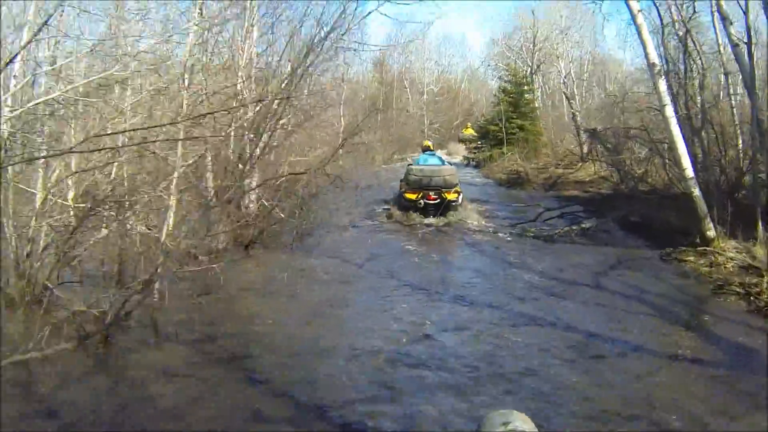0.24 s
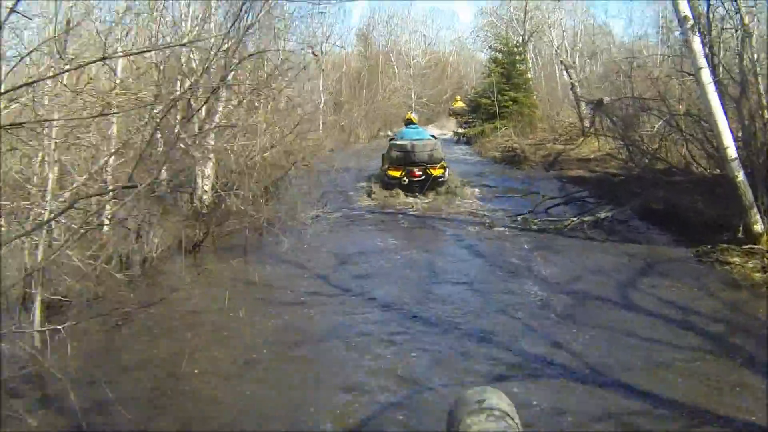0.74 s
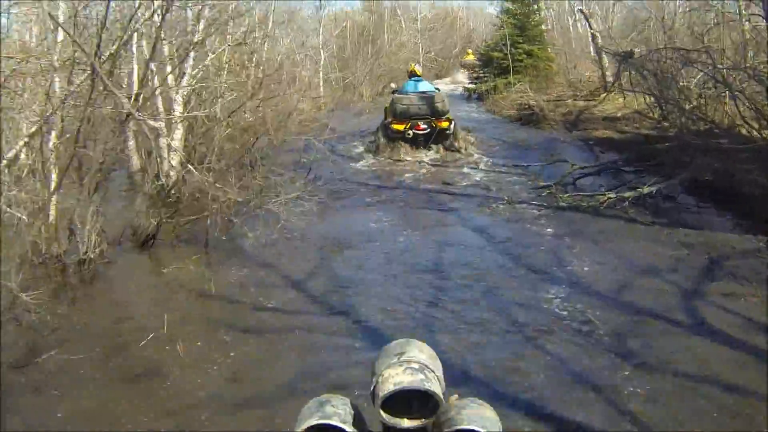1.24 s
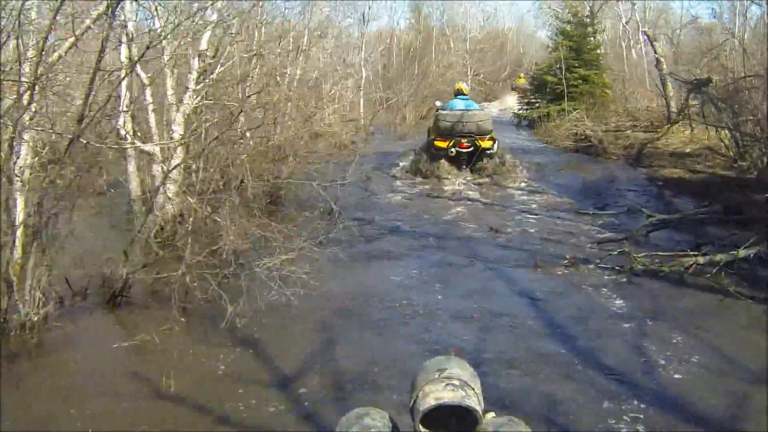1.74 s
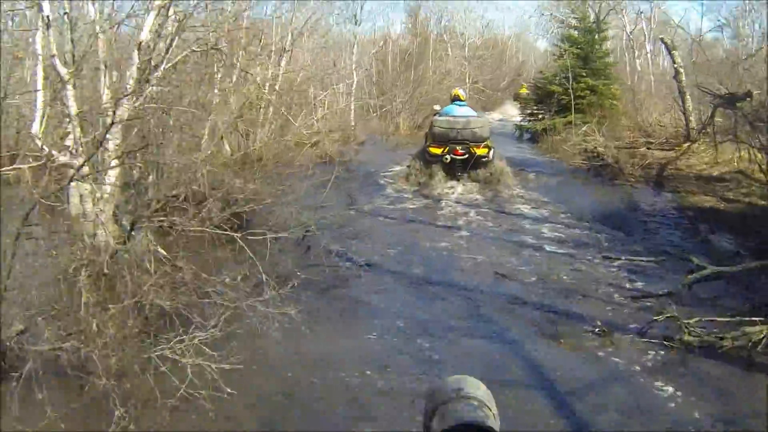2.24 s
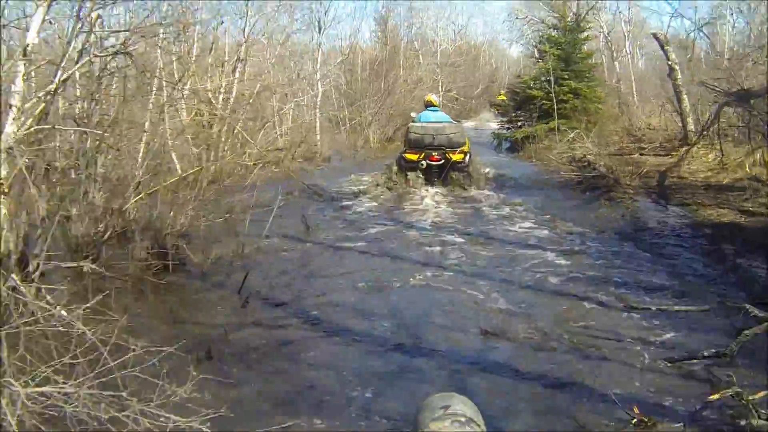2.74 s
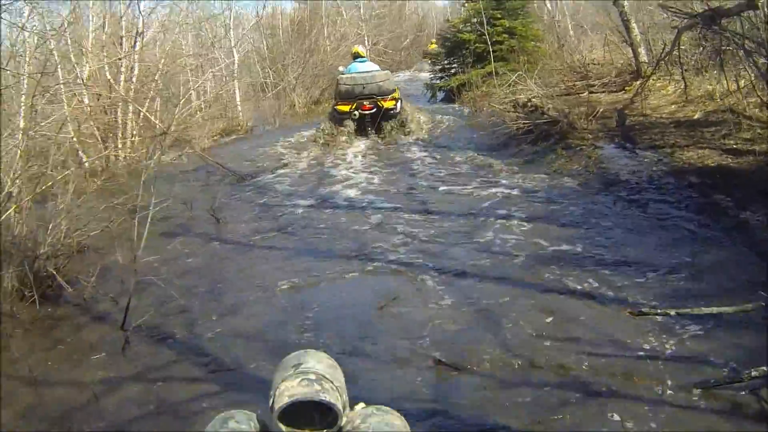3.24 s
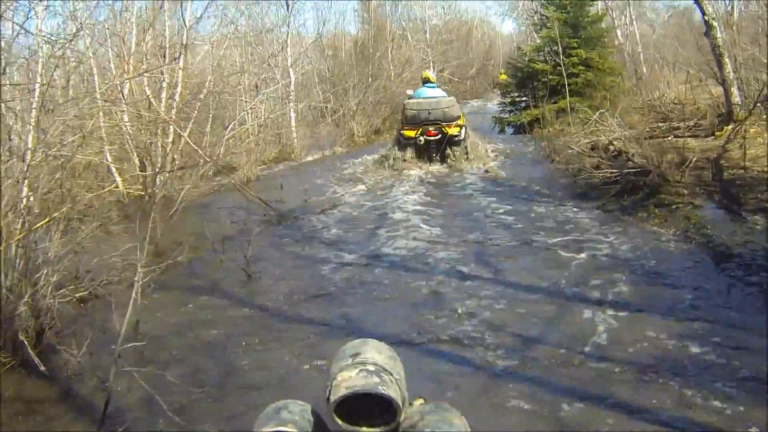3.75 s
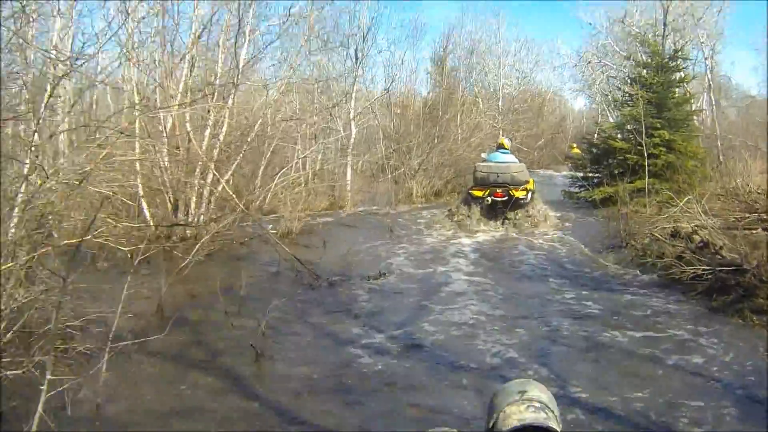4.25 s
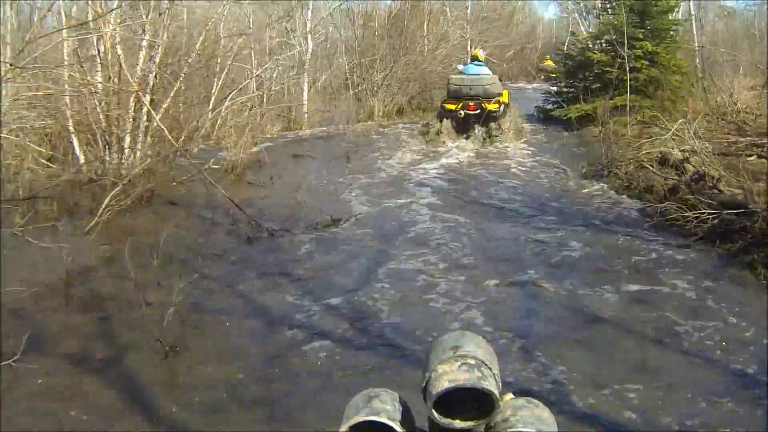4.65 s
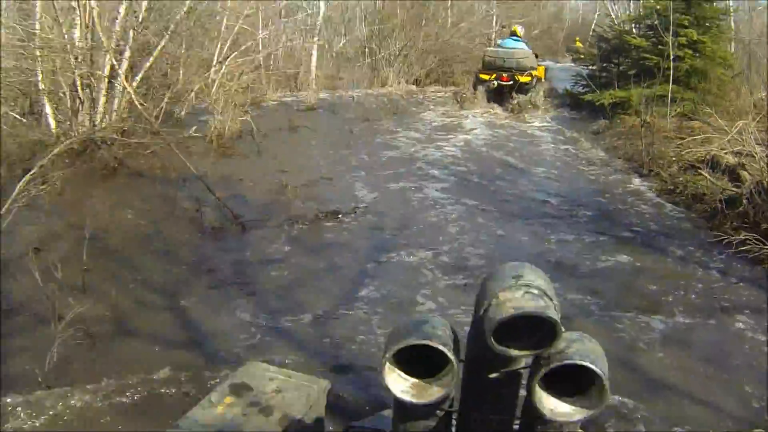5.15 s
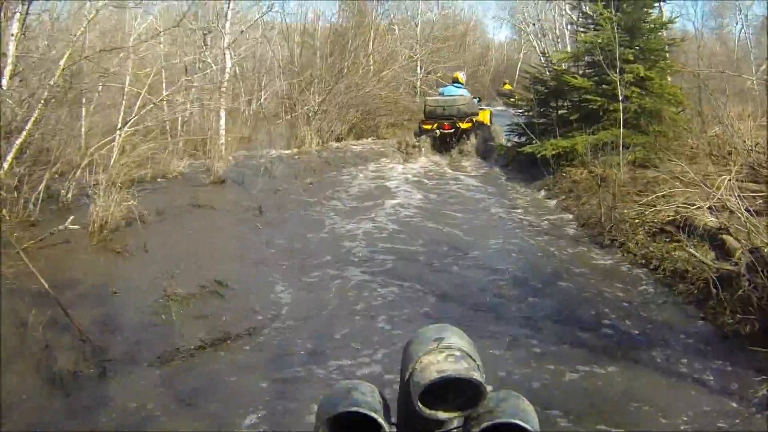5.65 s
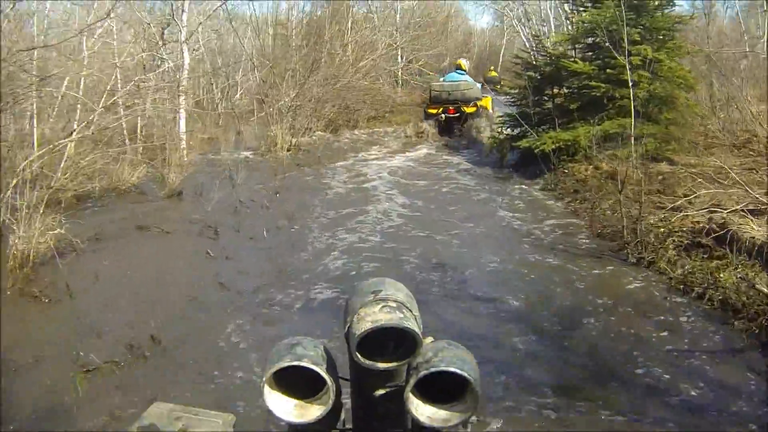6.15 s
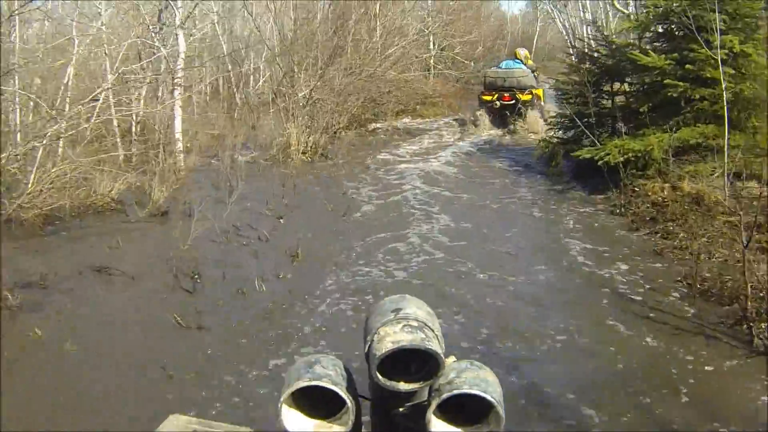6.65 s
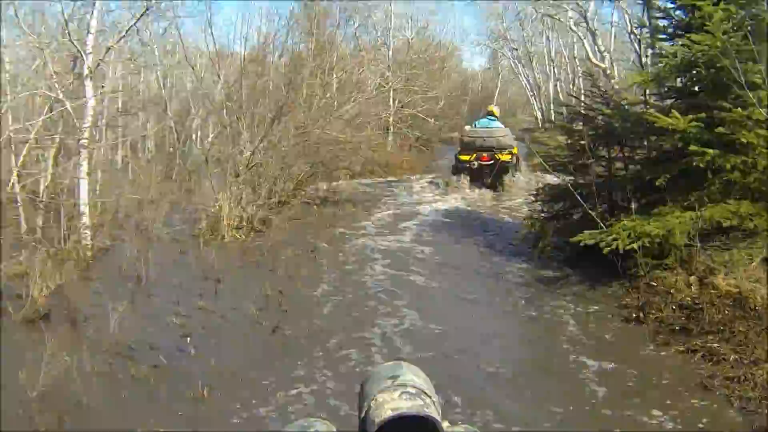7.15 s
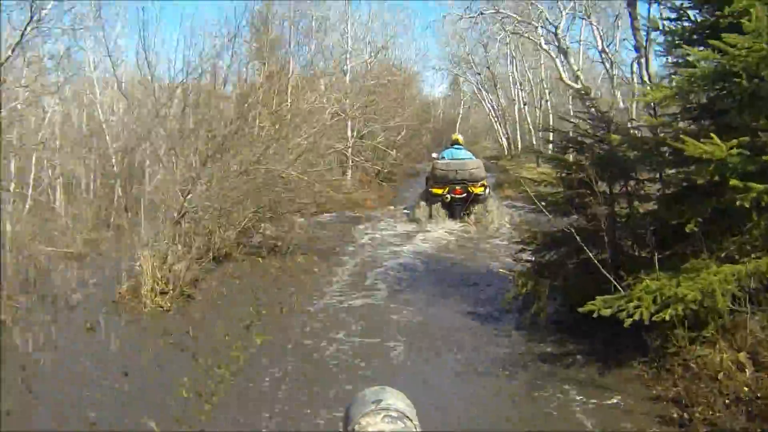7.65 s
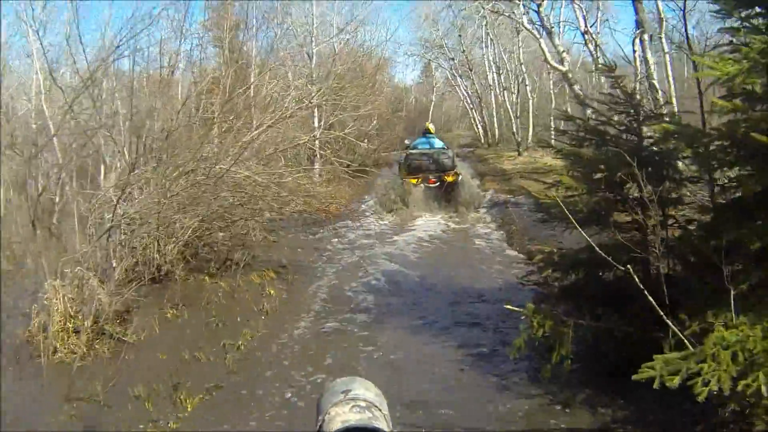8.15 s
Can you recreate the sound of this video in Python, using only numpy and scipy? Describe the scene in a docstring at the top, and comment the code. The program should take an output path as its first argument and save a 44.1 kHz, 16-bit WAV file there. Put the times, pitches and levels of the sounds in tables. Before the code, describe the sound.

A twin-cylinder all-terrain vehicle is already droning at the start, heard close from its seat in open flooded woodland. Revs dip slightly until about 0.6 seconds, the sound low and subdued, then climb with growing overtones and metallic clatter by 1.5 to 2. A tiny thumping stumble passes at 2.3. It pulls steadily through 3 and 4, pressing harder near 4.7 and 5.3, with faint gear whine. At 5.5 the throttle shuts and pitch drops; around 5.8 it leaps into a loud, rasping, clattering full-throttle roar lasting to 6.8. Revs sag until 7.4, then rise again to the end at 8.4. Snorkel rasp and thin intake hiss follow the engine. Muddy water washes and splashes quietly beneath throughout, with tiny plips. Deep wind buffets the microphone, gusting most around 4.7 and 5.3, again after 6.

```python
"""An engine drones from the start: a V-twin all-terrain vehicle wades along a flooded forest trail.
Heard from the seat, its exhaust sums tones locked to the crank; knocks and noise make clatter, rasp and hiss.
The throttle shuts briefly, opens wide, then eases.
Water, made of shaped noise and short plips, washes and splashes round the wheels.
Moving air, made of very low noise, buffets the microphone in gusts."""
import sys
import numpy as np
from scipy import signal
from scipy.fft import rfft, irfft, next_fast_len
from scipy.io import wavfile
from scipy.ndimage import uniform_filter1d

SR = 44100
rng = np.random.default_rng(int(sys.argv[2]) if len(sys.argv) > 2 else 0)


def output_pcm(signal):
    """Save a mono or channel-first signal as 16-bit PCM at the path in sys.argv[1].

    Samples are clipped to [-1, 1] before scaling.
    """
    pcm = np.clip(np.atleast_2d(signal).T, -1, 1) * 32767
    wavfile.write(sys.argv[1], SR, np.round(pcm).astype(np.int16))


N = 370881
TIME = np.arange(N) / SR

# engine speed; one cycle is two turns of a four-stroke crank: (time [s], speed [cycles/s])
ENGINE_SPEED = [(0, 35), (0.09, 32.29), (0.62, 30.51), (1.45, 33.05), (1.8, 35.79), (2.2, 37.49),
                (2.47, 37.57), (2.56, 37.32), (2.94, 37.75), (3.32, 39.25), (4.24, 39.14), (4.66, 40.49),
                (4.75, 42.52), (5.02, 40.22), (5.26, 41.61), (5.44, 41.38), (5.62, 32.99), (5.7, 33.32),
                (5.77, 36.11), (5.88, 44.41), (6.0, 48.39), (6.24, 48.13), (6.31, 49.48), (6.69, 49.84),
                (6.84, 47.8), (6.95, 43.53), (7.2, 39.84), (7.38, 38.96), (7.58, 41.06), (8.38, 44.16)]
# how far the throttle is open: (time [s], opening [0 shut - 1 wide open])
THROTTLE_OPENING = [(0, 0.23), (1.2, .25), (2, 0.41), (3, 0.46), (3.3, 0.48), (4.5, 0.52), (4.75, 0.8),
                    (5, 0.61), (5.25, 0.76), (5.45, 0.79), (5.5, .01), (5.66, 0.035), (5.8, 0.81),
                    (5.95, 0.99), (6.75, 0.95), (6.97, 0.85), (7.17, 0.65), (7.45, 0.7), (7.7, .78),
                    (8.41, 0.88)]
# strength of each exhaust tone: (multiple of cycle rate [-], shut [dB], half open [dB], wide open [dB])
FIRING_TONES = [(1.0, -11, -1, 12.5), (2.0, 7.5, 4, 9.5), (3.0, 4, -11, 7), (4.0, -7.5, 0.5, 4),
                (5.0, -21, 7, 3), (6.0, -2, 0.0, 2.5), (7.0, -16.5, -7.5, -6.5), (8.0, -3.5, -1.5, 9.5),
                (9.0, -0.5, -6, 8.5), (10.0, -19, 9, 5), (11.0, 0, 4.5, 3.0), (12.0, -2, -4.5, 5)]
# notes at which the exhaust pipe rings: (frequency [Hz], width [Hz], level [dB])
PIPE_RESONANCES = [(73.5, 12.7, -26.5), (109.7, 12.7, -21.5), (197.4, 14.8, -22.5), (255.9, 32.7, -29),
                   (346.8, 11.8, -32), (414, 45, -41.0), (555.5, 27, -39)]
# relative level of the exhaust's low thump: (time [s], level [dB])
THUMP_LEVEL = [(0, 0), (2.2, -1.5), (2.9, 1), (3.3, -3.5), (4.15, 4.5), (4.95, -3), (5.42, -1.5),
               (5.52, 2.5), (6.75, -2.5), (7.05, -5), (7.4, -1.5), (7.7, -2), (8.41, -0.5)]
# relative level of the exhaust's overtones: (time [s], level [dB])
OVERTONE_LEVEL = [(0, -7.5), (.25, -10.5), (.6, -5.5), (1.55, 2.5), (2, 1), (3.2, -2.5), (4.15, -0.7),
                  (5.05, 0.9), (5.38, -1), (5.48, -5), (5.66, 1), (5.83, 3.5), (6.05, -1.5), (6.82, .5),
                  (7.02, -3.5), (7.25, 0), (7.55, 0.5), (8.4, 1)]
# knocks within one cycle: (place [0-1 of a cycle], strength shut [-], strength wide open [-])
KNOCK_PLACES = [(.13, 0.91, 1), (.38, 0.76, 0.77), (0.591, 0.54, 0.84), (.81, 0.54, 0.52)]
# tone colour of the casing's clatter: (frequency [Hz], relative level [dB per Hz])
CLATTER_COLOUR = [(380, -19), (640, -35), (705, -20.5), (818, -7), (937, -8.5), (1020, -1), (1120, 3),
                  (1280, 0.5), (1450, -13.5), (1500, -7), (1950, -48), (3300, -120)]
# casing tones that the knocks favour: (multiple of cycle rate [-], shut [dB], wide open [dB])
FAVOURED_TONES = [(22, -5.5, 8), (23, 0.5, 0), (24, 2.5, 10), (25, -8.5, 1.5), (27, 6, 4.5), (28, 6.5, 6.5),
                  (31, 5.5, -3), (32, 5, -1)]
# relative level of the casing's clatter: (time [s], level [dB])
CLATTER_LEVEL = [(0, -28), (.6, -30), (1.3, -24.5), (1.6, -20), (1.9, -21.5), (3.05, -22.5), (3.2, -26.5),
                 (4.5, -23), (4.65, -22.5), (5, -23), (5.25, -23), (5.46, -24), (5.56, -31.5), (5.65, -31),
                 (5.72, -22), (5.9, -17.5), (6.15, -19.5), (6.55, -15), (7.05, -23.5), (7.3, -25),
                 (7.6, -22.5), (8, -24), (8.12, -19.5), (8.41, -21)]
# relative level of a gear's whine: (time [s], level [dB])
GEAR_LEVEL = [(0, -50), (3.3, -46), (4.55, -32), (4.85, -33.5), (5.2, -25), (5.55, -41), (7.4, -50),
              (7.8, -33.5), (8.41, -40)]
# tone colour of the snorkels' rasp: (frequency [Hz], relative level [dB per Hz])
RASP_COLOUR = [(820, -32), (1400, -9), (1470, -4.5), (1590, -1.5), (1770, -3), (1850, -0.5), (1920, 4.5),
               (2040, -5.5), (2220, -1.5), (2400, -13), (2610, -8.5), (2770, -11), (3190, -12.5),
               (3500, -16.5), (4550, -35.5), (7700, -120)]
# snorkel rasp at even throttle steps, shut to wide open: (level [dB])
RASP_BY_THROTTLE = [-29, -32, -30.5, -30, -27, -25.5]
# tone colour of the drawn air: (frequency [Hz], relative level [dB per Hz])
HISS_COLOUR = [(3000, -12), (3900, -4), (4500, -7), (4690, 1.5), (4900, -1.5), (5650, -8), (6100, -5.5),
               (7600, -13.5), (8150, -7.5), (10500, -18), (11500, -13), (13500, -22), (15000, -32)]
# hiss of drawn air at even throttle steps, shut to wide open: (level [dB])
HISS_BY_THROTTLE = [-56, -52.7, -54.5, -52.5, -51, -46.5]
# tone colour of the churned water: (frequency [Hz], relative level [dB per Hz])
WATER_COLOUR = [(40, -5), (130, -16), (300, -4.5), (450, -12.5), (570, -4), (690, -18), (1000, -17),
                (2000, -27), (4000, -30), (8000, -50.5), (15000, -65)]
# tone colour of the air at the microphone: (frequency [Hz], relative level [dB per Hz])
WIND_COLOUR = [(3, 4), (10, 3.5), (22, 2), (36, -10), (60, -14.5), (140, -18), (400, -57)]
# gusts at the microphone: (time [s], rise above the breeze [dB])
GUST_TIMES = [(0.02, 7.5), (1.43, 4.5), (3.7, 4), (4.1, 5.5), (4.68, 9.5), (5.28, 12), (6.19, 7), (6.62, 7)]

# unevenness of the firings (0-1): always, extra with the throttle shut,
# and extra per cycle/s gained or lost each second
UNEVEN, UNEVEN_SHUT, UNEVEN_PER_SLEW = 0.06, 0.13, 0.0028
# the engine stumbles once: extra unevenness (0-1), extra thump (dB)
STUMBLE_S, STUMBLE_LENGTH_S, STUMBLE_UNEVEN, STUMBLE_DB = 2.3, 0.035, 0.38, 6.5
HOP = 32  # samples between slow control values


def amp(db):
    """Turns decibels into gain."""
    return 10 ** (np.asarray(db) / 20)


def evened(x):
    """Scales a sound to an rms (average strength) of 1."""
    return x / np.sqrt(np.mean(x ** 2) + 1e-20)


def curves(rows):
    """Draws straight lines between a timed table's rows, one curve per column."""
    s, *columns = np.transpose(rows)
    return [np.interp(TIME, s, c) for c in columns]


def by_throttle(steps, throttle):
    """Reads values given at even throttle steps."""
    return np.interp(throttle, np.linspace(0, 1, len(steps)), steps)


def bump(at_s, length_s):
    """A smooth swell of height 1."""
    return np.exp(-((TIME - at_s) / length_s) ** 2)


def steadied(x, size=5000):
    """Evens out slow loudness changes, holding the short-time rms near 1."""
    power = uniform_filter1d(uniform_filter1d(x ** 2, size), size)
    return x / np.sqrt(abs(power) + 1e-12)


def wander(rate_hz):
    """Smooth random drift of rms 1."""
    knots = rng.standard_normal(8000)
    drift = np.interp(TIME * rate_hz, np.arange(len(knots)), knots)
    return evened(uniform_filter1d(drift, size=120))


def coloured(x, points, size=4096):
    """Gives a sound the listed colour; the filter only looks back, so peaks ring after a knock."""
    f, db = np.transpose(points)
    log_hz = np.log(np.abs(np.fft.fftfreq(size, 1 / SR)) + 1)
    # the level falls steeply outside the listed range
    skirts = np.maximum(np.log(f[0]) - log_hz, 0) + np.maximum(log_hz - np.log(f[-1]), 0)
    level_db = np.interp(log_hz, np.log(f), db) - 150 * skirts
    log_gain = np.log(amp(np.maximum(level_db, -100)))
    taps = np.fft.ifft(np.exp(np.conj(signal.hilbert(log_gain)))).real
    return signal.oaconvolve(np.r_[x[-size:], x], taps)[size:size + N]


def harmonics(turns, orders, sizes, shifts, waver):
    """Sums multiples of the crank cycle; each wavers a little in strength and phase."""
    out, slow = np.zeros(N), TIME[::HOP]
    for k, size, shift in zip(orders, sizes, shifts):
        drift = rng.standard_normal((2, len(slow)))
        a, b = uniform_filter1d(uniform_filter1d(drift, size=70), size=70)
        strength = size * np.exp(1j * shift) * (1 + waver * evened(a + 1j * b))
        tone = np.interp(TIME, slow, strength)
        out += (tone * np.exp(2j * np.pi * k * turns)).real
    return out


def unevenness(revs, throttle):
    """Firings are least regular off the throttle, while the speed changes, and in the stumble."""
    slew = uniform_filter1d(abs(np.gradient(revs)) * SR, size=4000)
    stumble = STUMBLE_UNEVEN * bump(STUMBLE_S, STUMBLE_LENGTH_S)
    uneven = UNEVEN + UNEVEN_SHUT * (1 - throttle) ** 2 + UNEVEN_PER_SLEW * slew + stumble
    return np.clip(uneven, 0, 1)


def exhaust(turns, throttle, uneven, second_firing=.39, thump_db=0.7, overtone_db=0.75):
    """Two unevenly spaced firings make tones that sing out as they cross the pipe's resonances."""
    order = np.arange(1, 18)[:, None]
    hz = order * curves(ENGINE_SPEED)[0][::HOP]
    # the charge in the cylinders follows the throttle smoothly
    charge = uniform_filter1d(throttle, size=3000)[::HOP]
    # the highest multiples share the last row
    rows = [FIRING_TONES[min(k, len(FIRING_TONES)) - 1] for k in order[:, 0]]
    firing_db = np.array([by_throttle(row[1:], charge) for row in rows])
    modes = np.array([amp(level) / (1 + 2j * (hz - f) / width) for f, width, level in PIPE_RESONANCES])
    firings = 1 + 0.85 * np.exp(-2j * np.pi * order * second_firing)
    lag = np.angle(modes.sum(0) * firings)
    thump = thump_db + curves(THUMP_LEVEL)[0] + STUMBLE_DB * bump(STUMBLE_S, STUMBLE_LENGTH_S)
    overtones = overtone_db + curves(OVERTONE_LEVEL)[0]
    level_db = np.where(order <= 4, thump[::HOP], overtones[::HOP])
    sizes = np.linalg.norm(modes, axis=0) * amp(firing_db + level_db)
    out = harmonics(turns, order[:, 0], sizes, lag, waver=.07)
    flutter = .6 * uneven
    return out * (1 + flutter * wander(110)) / np.sqrt(1 + flutter ** 2)


def knocks(turns, throttle, uneven, scatter_db=1.4, slip_s=.0003):
    """Firings and valve strokes: sharp pulses near fixed crank angles, never quite alike."""
    out, cycle = np.zeros(N), np.arange(int(turns[-1]))
    for place, shut, wide in KNOCK_PLACES:
        size, slip = rng.standard_normal((400, 2))[:len(cycle)].T
        s = np.interp(cycle + place, turns, TIME)
        # uneven running shifts each knock in time
        s = s + slip * slip_s * np.interp(s, TIME, uneven)
        at = np.clip(np.round(s * SR).astype(int), 0, N - 1)
        out[at] += (shut + (wide - shut) * throttle[at]) * amp(scatter_db * size)
    return out


def smeared(x, spread_s, ripple_hz):
    """Paths through the frame delay each pitch differently and blur a knock without colouring it."""
    hz = np.fft.rfftfreq(next_fast_len(N + 2000), 1 / SR)
    delay = spread_s * (1 + np.sin(2 * np.pi * hz / ripple_hz)) / 2
    turn = np.exp(-2j * np.pi * np.cumsum(delay) * hz[1])
    return irfft(rfft(x, 2 * len(hz) - 2) * turn)[:N]


def engine_part(pulses, colour, ring, steady, puff_s):
    """Each knock rings the part (ring: share of power) and lets out a puff of noise over a steady rush."""
    fade = np.exp(-1 / (puff_s * SR))
    puffs = steadied(signal.lfilter([1], [1, -fade], pulses))
    rush = coloured((steady + puffs) * rng.standard_normal(N), colour)
    rung = coloured(smeared(pulses, spread_s=0.004955, ripple_hz=408.3), colour)
    ring = np.clip(ring, 0, 1)
    return steadied(np.sqrt(ring) * steadied(rung) + np.sqrt(1 - ring) * steadied(rush))


def casing(turns, throttle, uneven, other_db=1.0):
    """Knocking that repeats every cycle makes a stack of tones, shaped by the casing's resonances."""
    blur, flutter = .4, .12  # random phase [rad], loudness flutter [share]
    order = np.arange(15, 47)[:, None]
    opening, hz = throttle[::HOP], order * curves(ENGINE_SPEED)[0][::HOP]
    favoured = {round(k): steps for k, *steps in FAVOURED_TONES}
    favour_db = np.array([by_throttle(favoured.get(k, [other_db]), opening ** 2) for k in order[:, 0]])
    db = favour_db + np.interp(hz, *np.transpose(CLATTER_COLOUR))
    # the tones add up roughly in step at each knock
    strokes = sum((shut + (wide - shut) * opening) * np.exp(-2j * np.pi * order * place)
                  for place, shut, wide in KNOCK_PLACES)
    lag = np.angle(strokes) + blur * rng.standard_normal(order.shape)
    out = harmonics(turns, order[:, 0], amp(db), lag, waver=.2)
    return steadied(out * (1 + (flutter + uneven / 2) * wander(90)))


def gear(turns, level_db=-1):
    """A gear locked to the crank whines at its tooth rate, 32 teeth a cycle."""
    whine = np.cos(2 * np.pi * 32 * turns + .4 * wander(30)) * (1 + .3 * wander(40))
    return amp(curves(GEAR_LEVEL)[0] + level_db) * evened(whine)


def whistle(hz=4690, width_hz=40):
    """Drawn air whistles thinly: slow random drift carried on a high tone."""
    r = np.exp(-np.pi * width_hz / SR)
    band = rng.standard_normal((2, N))
    for _ in range(2):
        band = signal.lfilter([1 - r], [1, -r], band)
    return evened(band[0] * np.cos(2 * np.pi * hz * TIME) + band[1] * np.sin(2 * np.pi * hz * TIME))


def engine(turns, throttle, uneven, clatter_db=-0.47, whistle_db=-12, throb_place=0.87, throb=0.53, shake=0.25):
    """The casing clatters, a gear whines, the snorkels rasp and drawn air hisses, led by the crank."""
    clatter = curves(CLATTER_LEVEL)[0]
    pulses = knocks(turns, throttle, uneven)
    # even running repeats cleanly; uneven running turns to loose noise
    clean = np.clip(.92 - uneven, 0, 1)
    loose = engine_part(pulses, CLATTER_COLOUR, ring=0, steady=0.38, puff_s=0.0022)
    rattle = np.sqrt(clean) * casing(turns, throttle, uneven) + np.sqrt(1 - clean) * loose
    # one cylinder knocks harder, so the rattle throbs once a cycle, most at light throttle
    beat = np.cos(2 * np.pi * (turns - throb_place))
    surge = steadied(1 + min(throb, 1) * (1 - throttle / 2) * beat)
    rasp = np.sqrt(surge) * engine_part(pulses, RASP_COLOUR, ring=.5, steady=2.3, puff_s=0.0092)
    # louder clatter also shakes the snorkels (shake: dB of rasp per dB of clatter)
    rasp_db = by_throttle(RASP_BY_THROTTLE, throttle) + shake * (clatter - clatter.mean())
    hiss = engine_part(pulses, HISS_COLOUR, ring=.02, steady=3.2, puff_s=.005)
    hiss = hiss + amp(whistle_db) * whistle()
    hiss_db = by_throttle(HISS_BY_THROTTLE, throttle)
    return (amp(clatter + clatter_db) * steadied(rattle * surge) + gear(turns)
            + amp(rasp_db) * rasp + amp(hiss_db) * hiss)


def water(wash_db=-39, swell_db=3.0, drops_db=-63, drops_per_s=300):
    """The churned wake is swelling noise; drops of spray fall back into it as short, fading plips."""
    wash = evened(coloured(rng.standard_normal(N), WATER_COLOUR)) * amp(wash_db + swell_db * wander(9))
    drops = np.zeros(N)
    pitches = np.geomspace(1500, 11000, num=16)
    for hz in pitches:
        sizes = amp(3.5 * np.minimum(rng.exponential(1, N), 4))
        hits = (rng.random(N) < drops_per_s / len(pitches) / SR) * sizes
        cycles = np.arange(600) * hz / SR
        # higher plips are weaker
        plip = np.sin(2 * np.pi * cycles) * cycles * np.exp(-cycles / 3) / hz
        drops += signal.oaconvolve(hits, plip)[:N]
    return wash + amp(drops_db) * evened(drops)


def wind(breeze_db=-27.0, swell_db=2.0, gust_s=0.092):
    """Lumps of air at the microphone: a restless breeze and a few gusts."""
    gusts_db = sum(db * bump(s, gust_s) for s, db in GUST_TIMES)
    level_db = breeze_db + swell_db * wander(4.4) + gusts_db
    rumble = coloured(rng.standard_normal(N), WIND_COLOUR, size=32768)
    return amp(level_db) * steadied(rumble, size=12000)


def scene():
    """One crank drives exhaust and engine, over water and wind."""
    revs = curves(ENGINE_SPEED)[0]
    throttle = np.clip(curves(THROTTLE_OPENING)[0], 0, 1)
    turns = np.cumsum(revs) / SR  # engine cycles so far
    uneven = unevenness(revs, throttle)
    mix = exhaust(turns, throttle, uneven) + engine(turns, throttle, uneven) + water() + wind()
    return mix[None]


def record(dry, edge_hz=15100):
    """Removes the highest treble, as the camera's limited band does."""
    low_pass = signal.firwin(511, edge_hz, window=("kaiser", 9), fs=SR)
    return signal.oaconvolve(dry, low_pass[None], "same")


dry = scene()
out = record(dry)
output_pcm(out)
```